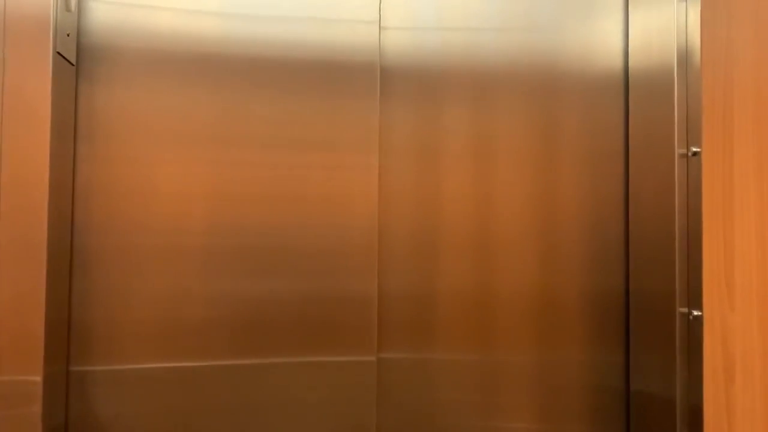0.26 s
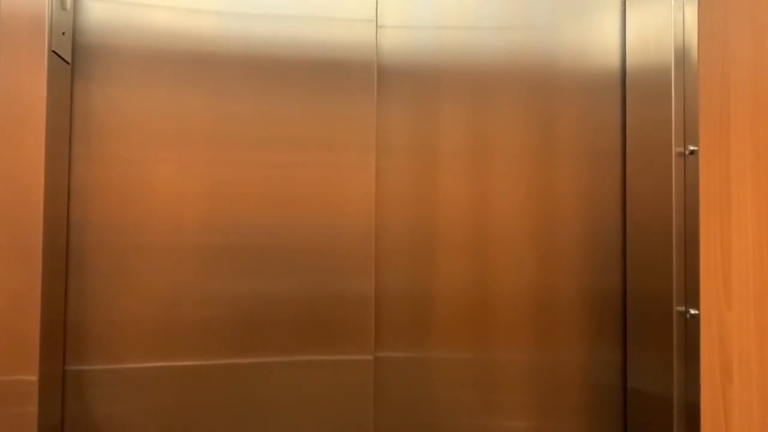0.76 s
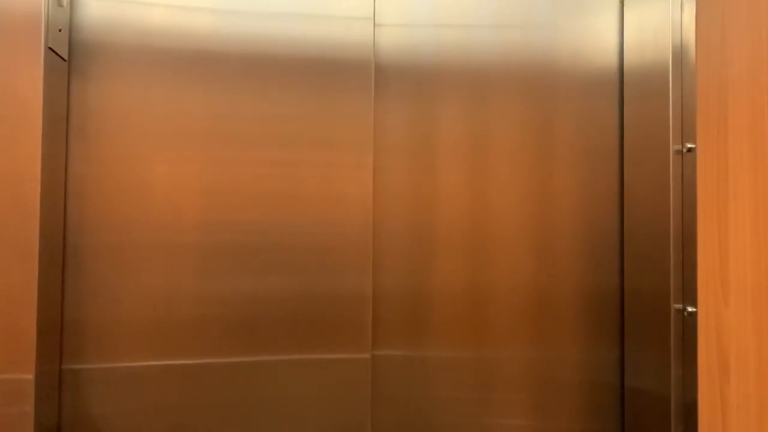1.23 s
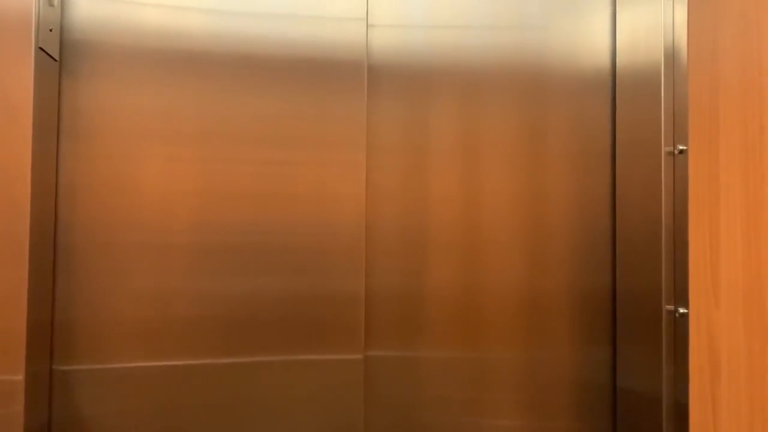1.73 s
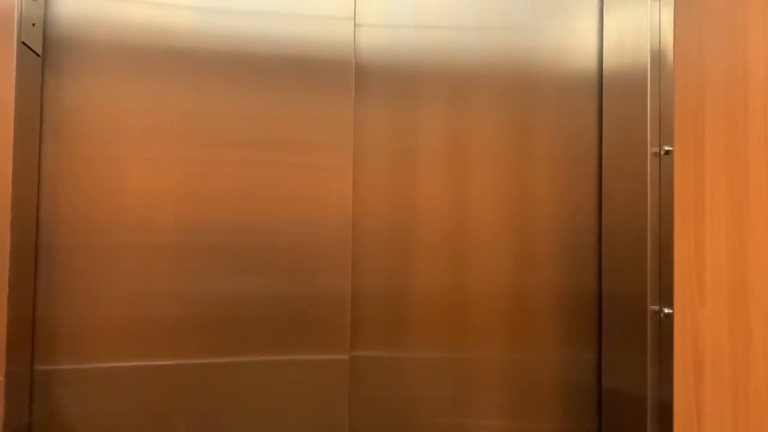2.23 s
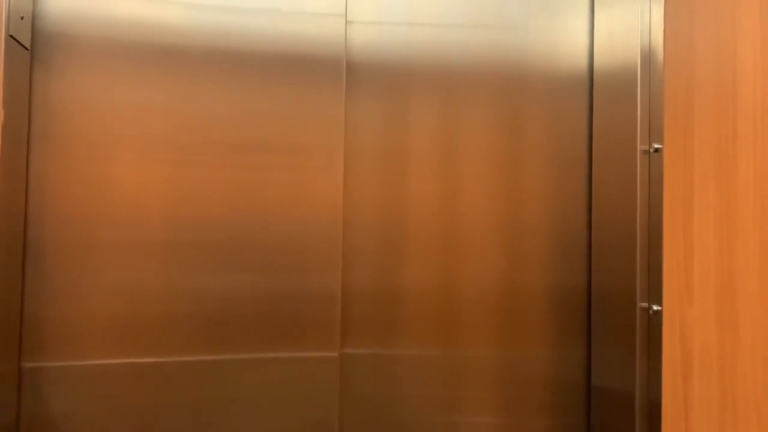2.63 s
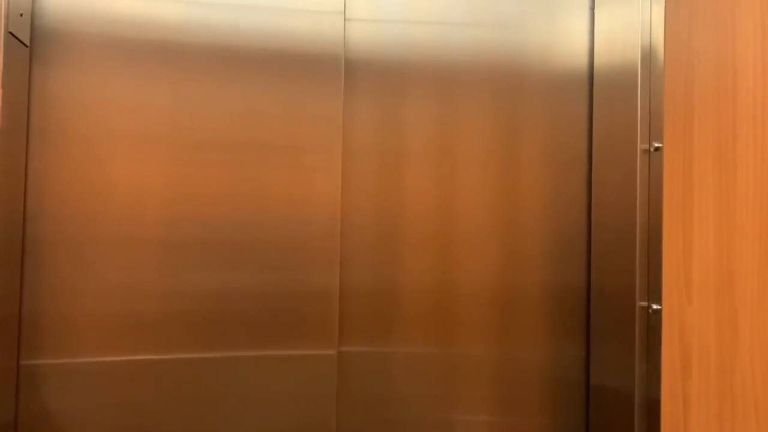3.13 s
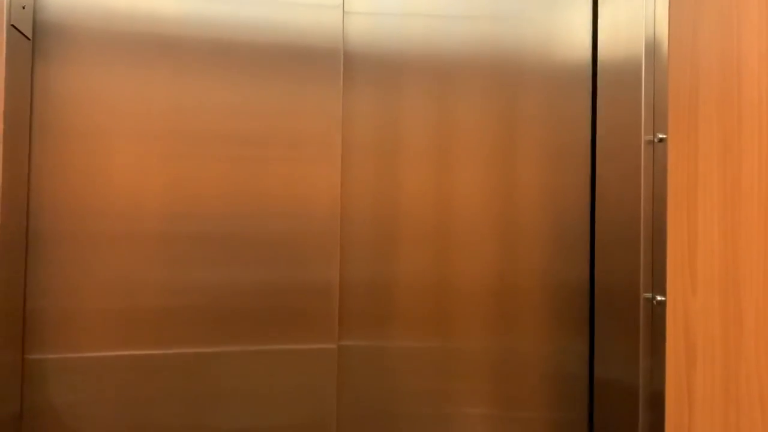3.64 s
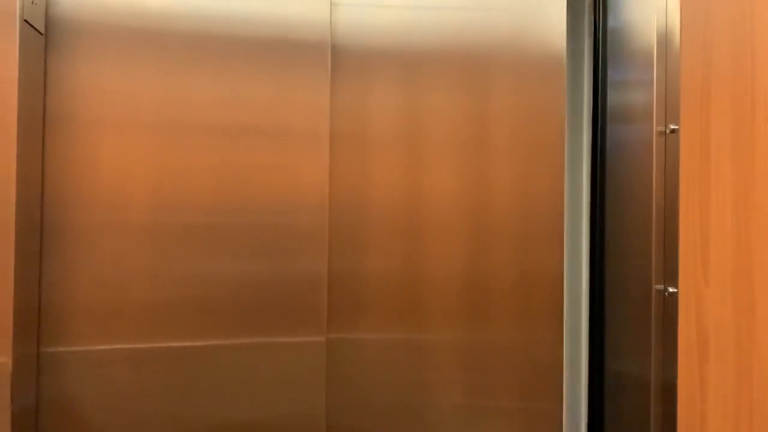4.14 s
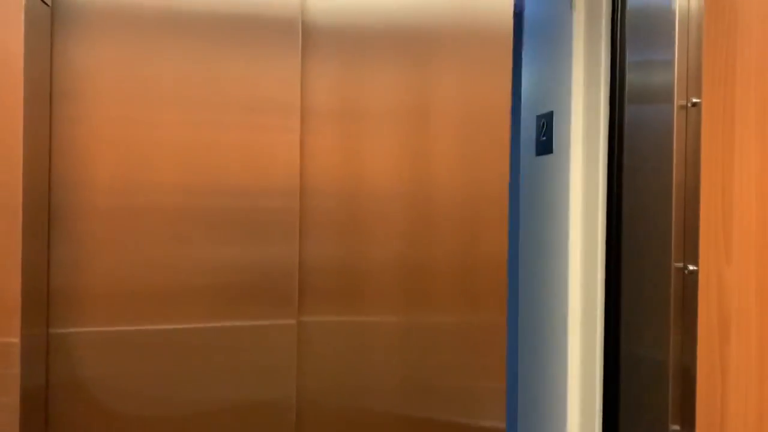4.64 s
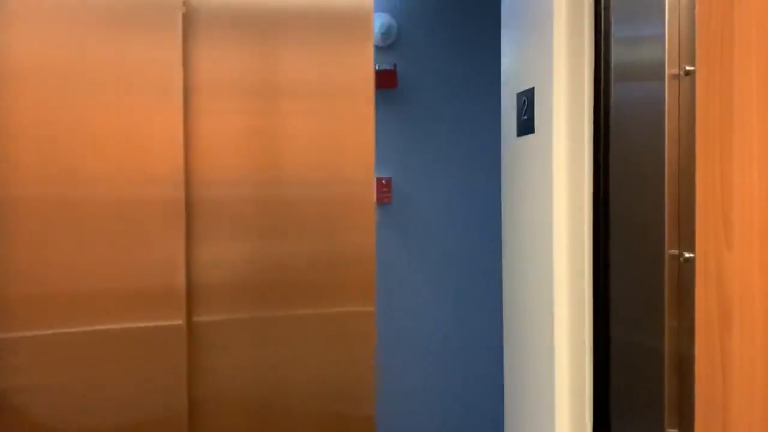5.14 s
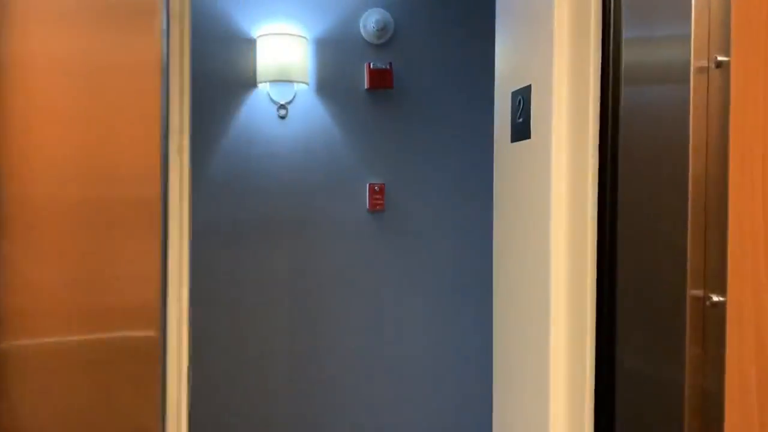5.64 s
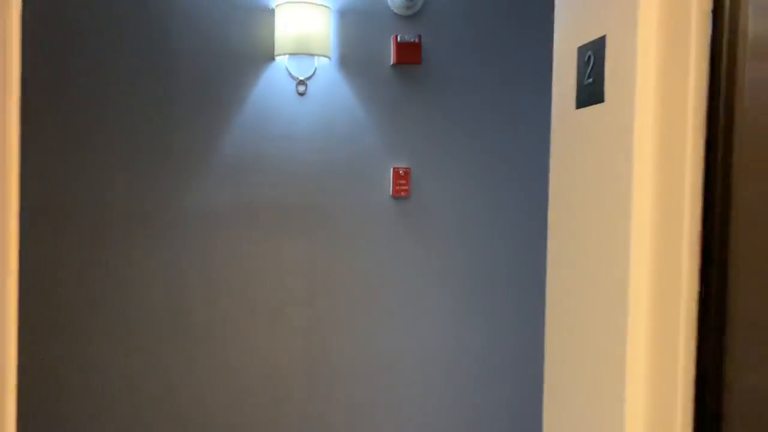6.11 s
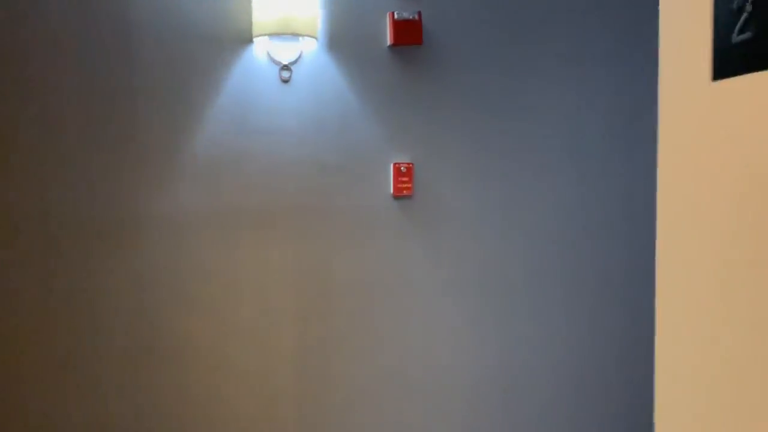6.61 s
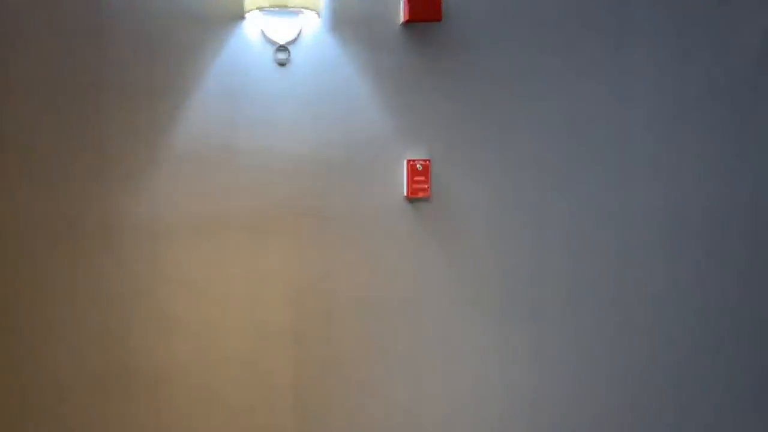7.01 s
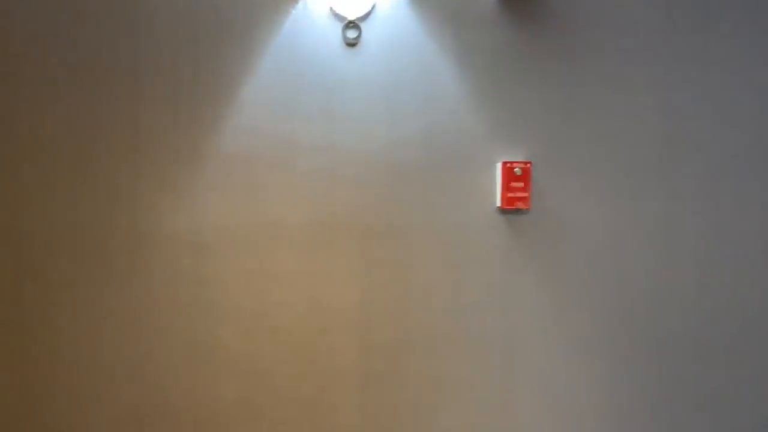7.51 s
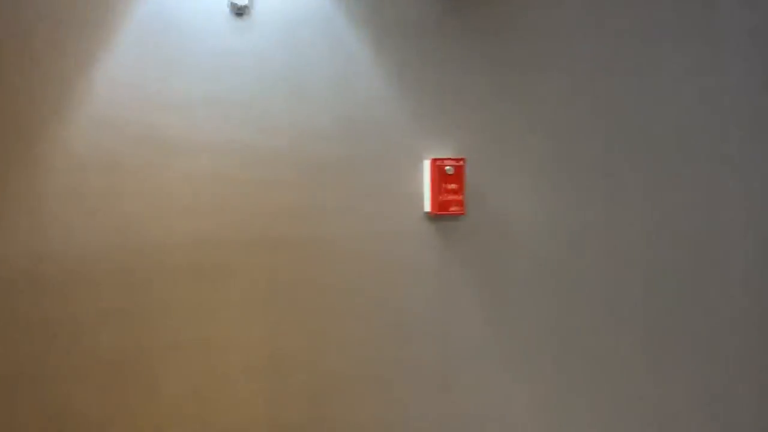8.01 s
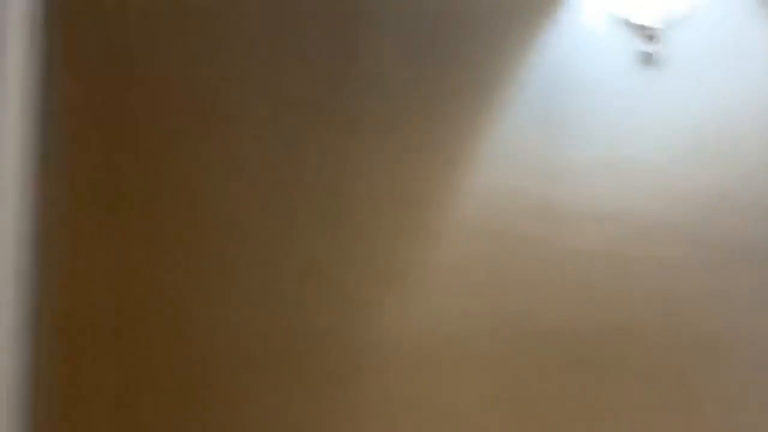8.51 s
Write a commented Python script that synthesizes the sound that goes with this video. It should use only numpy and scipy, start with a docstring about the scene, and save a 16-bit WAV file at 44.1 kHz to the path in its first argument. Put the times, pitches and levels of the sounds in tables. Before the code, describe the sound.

A fan hums inside an elevator, then the door clunks and slides open, and soft footsteps move out as the hum fades.

```python
"""A ceiling fan hums and blows close above the microphone, inside a steel elevator cab nearing a landing.
The ride's rumble dies away. Close by, the door unlatches with a clunk, rolls open with a hiss and faint
squeaks, and bumps its rubber stop. The stereo microphone is carried out into the corridor at ear height,
with soft steps and rustling clothes right under it, and the fan falls behind."""
import sys
import numpy as np
from scipy import signal
from scipy.fft import rfft, irfft, next_fast_len
from scipy.io import wavfile

SR = 44100
rng = np.random.default_rng(int(sys.argv[2]) if len(sys.argv) > 2 else 0)


def dump(signal):
    """Clip the signal to [-1, 1] and save it as 16-bit WAV at the path in sys.argv[1]."""
    limited = np.clip(np.atleast_2d(signal).T, -1, 1)
    pcm = np.round(limited * 32767).astype(np.int16)
    wavfile.write(sys.argv[1], SR, pcm)


N = 386307
TIME = np.arange(N) / SR
HALF_OPEN_S = 5.04  # the door is at mid-travel
STREAM_FOLLOWS = 0.86  # share of the hum's level changes that the air stream follows
BASS_LEAD_RAD = 0.27  # the bass reaches the right channel first

# the fan at the microphone, in the cab and then walking out: (time [s], hum [dB], octave [dB])
FAN_LEVEL = [(0.2, -23.5, -35), (1.3, -23, -38), (2.0, -24, -40.5), (3.2, -23, -37), (4.2, -23, -37),
             (5.1, -24, -34.5), (6.2, -26, -43), (7.0, -31.5, -50.5), (7.7, -34, -52), (8.3, -32.5, -50),
             (8.7, -32.5, -44.5)]
# stereo balance at the microphone: (frequency [Hz], left minus right [dB])
BALANCE = [(110, -3), (220, -3), (400, -0.5), (700, -0.5), (4000, -0.1), (9000, -1)]
# spectrum of loose door hardware: (frequency [Hz], density [dB])
RATTLE = [(700, -21), (1400, 5.5), (1800, -3), (2400, -2.5), (3300, -4.5), (5000, -7.5), (8000, -14.5),
          (11000, -17), (15000, -47)]


def fan_hum(hum_hz=118.1, sag_hz=0.65):
    """The fan motor overhead hums unsteadily, a little slower while the car moves."""
    # weak overtones of the motor: (harmonic [number], level [dB])
    overtones = [(3, -61), (4, -63.5)]
    pitch = hum_hz - sag_hz * car_moving()
    phase, hz = 2 * np.pi * np.cumsum(pitch) / SR, pitch.mean()
    hum_db, octave_db = in_time(FAN_LEVEL)
    hum_db = hum_db - hump(3.68, 17, 0.016)  # a brief dip under the latch's clunk
    hum = (1 + 0.057 * flutter(8.4, 3.6)) * tone(phase + 0.027 * flutter(10, 2.2), hz)
    octave = (1 + 0.4 * flutter(3.2, 7.5)) * tone(2 * phase + 0.39 * flutter(6.1, 4.4), 2 * hz)
    # the microphone passes through a standing wave in the corridor, which lifts the third harmonic
    lifts_db = hump(8.48, 14.5, 0.28), 0
    upper = sum(from_db(db + lift_db) * tone(k * phase, k * hz)
                for (k, db), lift_db in zip(overtones, lifts_db))
    upper *= fan_gain(0, follows=0.6) * (1 + 0.21 * flutter(1.4, 5.7))
    return from_db(hum_db) * hum + from_db(octave_db) * octave + upper


def fan_air():
    """Air rushes from the fan; as the door opens, the cab's resonances give way to the corridor's."""
    # spectrum of the air stream: (frequency [Hz], density [dB])
    stream = [(250, -16), (420, 2), (540, 3.5), (700, 1), (950, -1.5), (1200, -1), (1800, -5.5), (2200, -6),
              (2700, -8), (3300, -15), (4500, -17.5), (7000, -34.5), (15000, -51)]
    # resonances of the cab's grille and panels: (frequency [Hz], width [Hz], lift [dB])
    grille = [(482, 36, 10), (559, 30, 8), (704, 15, 10), (808, 84, 4.5), (1177, 98, 9), (1650, 110, 2.5),
              (2540, 300, 3), (3940, 1400, 3), (6360, 820, 5)]
    # resonances of the corridor: (frequency [Hz], width [Hz], lift [dB])
    corridor = [(1120, 470, 5.5), (1510, 24, 9.4)]
    opening = door_open()
    closed = np.sqrt(1 - opening) * fan_gain(-45.5, STREAM_FOLLOWS) * noise(stream, grille)
    opened = np.sqrt(opening) * fan_gain(-46, STREAM_FOLLOWS) * noise(stream, corridor)
    return closed + opened


def panel_drone():
    """The cab's panels drone in the fan's air, all around the microphone."""
    # spectrum of the drone: (frequency [Hz], density [dB])
    drone = [(38, -6), (50, -5), (100, 3.5), (128, 10), (148, -4.5), (205, -13), (232, 2), (260, -10.5),
             (345, -6), (430, -16), (700, -25)]
    # panel resonances: (frequency [Hz], width [Hz], lift [dB])
    panels = [(83.6, 2.8, 2.5), (176, 28, 11), (273.2, 25, 11.5), (301, 4.8, 7.5), (349, 28, 7),
              (389.4, 6.2, 7.5)]
    return fan_gain(-35.5, follows=1) * noise(drone, panels)


def fan_whines(waver=0.003):
    """Thin, slightly unsteady tones of the fan that fade with its air stream."""
    # the fan's high tones: (frequency [Hz], relative level [dB])
    whines = [(1922, -76), (2509, -74.5), (2923, -76.5), (3590, -79), (3898, -82), (4210, -80), (4900, -83)]
    phase_per_hz = 2 * np.pi * np.cumsum(1 + waver * flutter(0.79, 6)) / SR
    tones = sum(from_db(db) * tone(hz * phase_per_hz, hz, lead_rad=0.73) for hz, db in whines)
    return fan_gain(-4, STREAM_FOLLOWS) * tones


def hiss():
    """A high hiss of fan air and sliding door, with a slight random level wobble added."""
    # spectrum of the hiss: (frequency [Hz], density [dB])
    spectrum = [(1500, -13.5), (3900, 9.5), (5400, 2.5), (6500, 4.5), (8500, 2.5), (10200, 2.5),
                (13700, -5.5), (15000, -26)]
    gain = np.hypot(fan_gain(-64.5, follows=0.5), door_running() * from_db(-60.5))
    return gain * from_db(1.85 * flutter(2.2, 12)) * noise(spectrum)


def door_thuds(clang_db=-33):
    """Soft knocks of the door gear thud through the cab and faintly ring the steel; the last one is a first
    step onto the sill."""
    # knocks of the gear, then the first step onto the sill: (time [s], level [dB])
    knocks = [(3.527, -27), (3.546, -26.5), (3.584, -26), (3.613, -33), (3.669, -27), (3.712, -25.5),
              (6.709, -31)]
    # spectrum of a thud: (frequency [Hz], density [dB])
    spectrum = [(35, -19), (75, 0), (120, 8.5), (180, -2), (290, 0), (350, -8), (430, -15), (700, -15.5),
                (1500, -35)]
    out = np.zeros((2, N))
    for s, db in knocks:
        thud = burst(spectrum, t60=0.32, rise_s=0.0015, tail_db=-11, tail_t60=0.99)
        add(out, s, from_db(db) * (thud + from_db(clang_db) * steel_clang()))
    return out


def door_latch(rattle_lead_s=0.0073, rattle_peak_s=3.64, fall_db_per_s=295):
    """The latch snaps and rebounds unevenly; the linkage rattles just ahead of each contact."""
    # contacts of the latch: (time [s], level [dB])
    contacts = [(3.623, -26), (3.637, -26.5), (3.648, -30), (3.664, -30.5), (3.682, -35)]
    out = np.zeros((2, N))
    add(out, 3.526, from_db(-40) * steel_clang())  # the coupler first taps the latch
    for s, db in contacts:
        rattle = burst(RATTLE, t60=0.085, rise_s=0.00064, tail_db=-10.5, tail_t60=0.34)
        rattle_db = -35.5 - fall_db_per_s * abs(s - rattle_peak_s)
        add(out, s - rattle_lead_s, from_db(rattle_db) * rattle)
        add(out, s, from_db(db) * steel_clang())
    return out


def steel_clang(rise_s=0.00079):
    """Latch hook and cab ring after a blow, and the door panel's modes sound in random phases."""
    # spectrum of the struck steel: (frequency [Hz], density [dB])
    steel = [(200, -11), (315, 9), (420, -4), (540, 8), (760, -4.5), (1050, -1.5), (1400, -9), (1800, -13),
             (2500, -17), (8000, -41)]
    # resonances of the latch hook: (frequency [Hz], width [Hz], lift [dB])
    hook = [(1040, 70, 9), (1225, 70, 8), (2260, 160, 6), (2700, 200, 5)]
    # door panel modes: (frequency [Hz], relative level [dB], t60 [s])
    modes = [(237, -12, 0.7), (297, -8, 0.6), (345, -9, 0.7), (479, -18, 0.7), (671, -21, 0.8),
             (719, -21, 0.7), (1034.5, -11, 0.24), (1093, -16, 0.36), (1197, -16, 0.3), (1356, -17, 0.25),
             (2226, -17, 0.15), (2476, -23, 0.2)]
    blow = burst(steel, t60=0.13, rise_s=0.00033, tail_db=-12.5, tail_t60=0.84, peaks=hook)
    t = np.arange(SR // 2) / SR
    panel = np.zeros_like(blow)
    for hz, db, t60 in modes:
        phase, lead_rad = rng.normal(0, [np.pi, 0.5])
        panel += from_db(db - 60 * t / t60) * tone(2 * np.pi * hz * t + phase, hz, lead_rad)
    return from_db(1.5) * blow + from_db(-3) * panel * (1 - np.exp(-t / rise_s))


def door_rollers(level_db=-50, sweep_lift_db=2):
    """Rollers rumble along their track, a little louder with the door's speed."""
    # spectrum of the rolling: (frequency [Hz], density [dB])
    rolling = [(250, 4.5), (410, 3.5), (540, -18), (1050, -7), (1800, -15.5), (4200, -24), (9000, -32)]
    # resonances of the track: (frequency [Hz], width [Hz], lift [dB])
    track = [(413, 33, 11), (1160, 120, 5), (2430, 400, 5)]
    opening = door_open()
    speed = 4 * opening * (1 - opening)
    gain = door_running() * from_db(level_db + sweep_lift_db * speed + 5 * flicker(1.4, 16))
    return gain * noise(rolling, track)


def floor_shake(easing_db=5):
    """The running door shakes the floor under the microphone, less once it is open and slowing."""
    # spectrum of the floor: (frequency [Hz], density [dB])
    spectrum = [(25, -6), (45, -8), (70, -2), (120, -8)]
    return door_running() * from_db(-40.5 - easing_db * door_open()) * noise(spectrum)


def door_stop(hangers_db=-27):
    """The door bumps its rubber stop and settles; its hangers rattle at each contact."""
    # contacts with the stop: (time [s], level [dB])
    contacts = [(6.879, -24.5), (6.909, -34), (6.934, -33)]
    # spectrum of a bump: (frequency [Hz], density [dB])
    spectrum = [(60, -16), (150, 3.5), (280, 0), (420, -6), (600, -4), (780, -17.5), (1050, -15),
                (1500, -29), (2700, -25), (5000, -38), (10000, -45)]
    # resonances of the stop: (frequency [Hz], width [Hz], lift [dB])
    rings = [(170, 16, 8), (458, 50, 7), (645, 100, 9), (910, 60, 8)]
    out = np.zeros((2, N))
    for s, db in contacts:
        bump = burst(spectrum, t60=0.09, rise_s=0.0005, tail_db=-14.5, tail_t60=1.0, peaks=rings)
        hangers = burst(RATTLE, t60=0.13, rise_s=0.0003, tail_db=-16, tail_t60=0.27)
        add(out, s, from_db(db) * (bump + from_db(hangers_db) * hangers))
    return out


def drive_belt(hz=2460, width_hz=55):
    """The belt sings thinly, on and off, through the second half of the door's travel."""
    singing = ramp(4.75, 0.6) * (1 - ramp(6.98, 0.53))
    whine = np.array([flutter(hz, width_hz) for channel in range(2)])
    return singing * from_db(-62.5 + 4 * flicker(5.6, 4)) * whine


def roller_squeaks(waver=0.0085):
    """A roller sings briefly, unsteady in pitch."""
    # squeaks: (time [s], length [s], pitch [Hz], level [dB])
    squeaks = [(5.528, 0.085, 9250, -61), (5.73, 0.12, 2430, -55), (6.393, 0.038, 8100, -55.5),
               (7.042, 0.072, 9200, -65), (7.088, 0.084, 9100, -60)]
    out = np.zeros((2, N))
    unsteady = 1 + waver * flutter(30, 60)
    for s, length, hz, db in squeaks:
        n = int(length * SR)
        phase = 2 * np.pi * hz * np.cumsum(unsteady[int(s * SR):][:n]) / SR
        add(out, s, from_db(db) * np.hanning(n) * tone(phase, hz, lead_rad=1))
    return out


def gear_ticks():
    """Small parts of the door gear touch and ring briefly."""
    # ticks: (time [s], level [dB], ringing [Hz])
    ticks = [(2.449, -52.5, 5070), (2.619, -54.5, 5700), (2.803, -63, 7200), (5.359, -48.5, 4040),
             (5.746, -50, 3000)]
    return light_contacts(ticks, t60=0.12, rise_s=0.00046, ring_db=13)


def ride_rumble(hz=35.6, brake_s=0.86, halt_s=1.82, fall_db_per_s=34):
    """The car shudders at one low, unsteady frequency, harder as it brakes, then dies away."""
    level_db = -45.5 + 5 * ramp(brake_s, 0.25) - fall_db_per_s * np.maximum(TIME - halt_s, 0)
    phase = 2 * np.pi * hz * TIME + 0.46 * flutter(2.5, 1.9)
    return from_db(level_db) * (1 + flutter(2.8, 5)) * tone(phase, hz)


def rail_rub():
    """Beyond the cab wall, the guides rub along the shaft's rails until the car stops."""
    # spectrum of the rubbing: (frequency [Hz], density [dB])
    spectrum = [(560, -2), (800, 3.5), (940, -14.5), (1180, 3), (1500, -5.5), (2200, -19.5),
                (4800, -29), (6000, -37.5)]
    return car_moving() * from_db(-56 + 6.5 * flicker(5, 5.5)) * noise(spectrum)


def footsteps():
    """Shoes land dully below the microphone, over the sill and beyond."""
    # footfalls: (time [s], level [dB])
    steps = [(6.764, -29), (6.986, -33), (7.225, -33.5), (7.297, -30), (7.566, -45), (7.61, -37.5),
             (7.691, -40)]
    # spectrum of a footfall: (frequency [Hz], density [dB])
    spectrum = [(35, -23), (80, 11), (130, 1.5), (220, 7.5), (330, -12), (520, -13), (750, -29),
                (1500, -28)]
    out = np.zeros((2, N))
    for s, db in steps:
        add(out, s, from_db(db) * burst(spectrum, t60=0.23, rise_s=0.0039, tail_db=-15.5, tail_t60=0.78))
    return out


def shuffle():
    """Clothes brush and shoes shuffle in one uneven swell on the way out."""
    # spectrum of the brushing: (frequency [Hz], density [dB])
    spectrum = [(150, 6), (300, -4.5), (600, -14.5), (1500, -20.5), (4000, -28.5), (9000, -32),
                (14000, -60)]
    return hump(7.55, from_db(-46.5), 0.35) * from_db(2.5 * flutter(4.6, 14)) * noise(spectrum)


def rustles():
    """Brief, soft-edged rustles and scuffs near the microphone."""
    # rustles and scuffs: (time [s], level [dB], centre [Hz])
    scuffs = [(2.660, -44, 3870), (2.735, -44, 2490), (2.904, -48.5, 6030), (3.588, -42.5, 6500),
              (3.783, -42.5, 6100), (5.452, -47, 8100), (6.159, -48, 6700), (6.262, -46, 5460),
              (6.805, -46, 12000), (7.228, -39, 490), (7.465, -59, 11000), (7.528, -55, 11000),
              (7.595, -42, 540), (7.616, -51, 8800), (7.77, -43.5, 850)]
    return light_contacts(scuffs, t60=0.14, rise_s=0.013, ring_db=-1)


def clinks(ring_db=10, width_hz=450, range_hz=(8200, 13900)):
    """Metal pieces on clothing clink close to the microphone, each with three high resonances."""
    # touches of metal: (time [s], level [dB])
    touches = [(5.645, -46), (6.826, -43), (7.757, -46), (7.766, -43), (8.058, -47), (8.068, -48.5),
               (8.347, -49.5)]
    # spectrum of a clink: (frequency [Hz], density [dB])
    spectrum = [(2500, -24), (5500, -6), (9000, -10), (10700, -7), (13400, -6), (14400, -1), (15600, -17)]
    out = np.zeros((2, N))
    for s, db in touches:
        rings = [(hz, width_hz, ring_db) for hz in rng.uniform(*range_hz, 3)]
        clink = burst(spectrum, t60=0.0085, rise_s=0.0009, tail_db=-11.5, tail_t60=0.24, peaks=rings)
        add(out, s, from_db(db) * clink)
    return out


def fan_gain(db, follows):
    """Gain that follows a share of the hum's level changes as the fan falls behind."""
    fan_db = in_time(FAN_LEVEL)[0]
    return from_db(db + follows * (fan_db - np.median(fan_db)))


def car_moving():
    """1 while the car travels, easing to 0 as it settles at the landing."""
    return 1 - ramp(2.2, 0.9)


def door_open(sweep_s=0.18):
    """Share of the doorway that is open: a slow start, a quick sweep, a slow finish."""
    return .5 + .5 * np.tanh((TIME - HALF_OPEN_S) / sweep_s)


def door_running(start_s=3.36, stop_s=6.65, nearing_db_per_s=1.5):
    """Gain of the door's running noise, which grows as the microphone nears the track."""
    running = ramp(start_s, 0.36) * (1 - ramp(stop_s, 0.67))
    return running * from_db(nearing_db_per_s * (TIME - HALF_OPEN_S))


def light_contacts(rows, t60, rise_s, ring_db, grain_db=3):
    """Broad, grainy bursts, with a resonance at the centre where something small rings."""
    out = np.zeros((2, N))
    for s, db, hz in rows:
        colour = [(hz / 4, -10), (hz / 2, -5), (hz, 0), (2 * hz, -10), (4 * hz, -25)]
        contact = burst(colour, t60, rise_s, tail_db=-16, tail_t60=0.43, peaks=[(hz, 0.13 * hz, ring_db)])
        add(out, s, from_db(db) * contact)
    return out * from_db(grain_db * flicker(60, 90))


def burst(spectrum, t60, rise_s, tail_db, tail_t60, peaks=()):
    """A blow on densely packed modes: a quick rise, its own decay, and the cab's longer tail."""
    t = np.arange(SR // 2) / SR
    decay = from_db(-60 * t / t60) + from_db(tail_db - 60 * t / tail_t60)
    return noise(spectrum, peaks, size=len(t)) * decay * (1 - np.exp(-t / rise_s))


def noise(spectrum, peaks=(), size=N, apart_hz=452):
    """Diffuse noise at the microphone: channels alike in the bass, unrelated in the treble; rms 1."""
    n = next_fast_len(size, real=True)
    f = np.arange(n // 2 + 1) * SR / n
    db = at_hz(spectrum, f) + sum(lift / (1 + (2 * (f - hz) / width) ** 2) for hz, width, lift in peaks)
    low_cut = 1 / (1 + (spectrum[0][0] / (1.5 * f + 1)) ** 4)
    high_cut = 1 / (1 + (f / (2 * spectrum[-1][0])) ** 4)
    mid, side = rfft(rng.standard_normal((2, n))) * from_db([wall_ripple(f), wall_ripple(f)])
    alike = .98 / (1 + (f / apart_hz) ** 6)
    sides = np.array([[1], [-1]])
    pair = np.sqrt(1 + alike) * mid + np.sqrt(1 - alike) * side * sides
    pair *= from_db(sides * at_hz(BALANCE, f) / 2) * np.exp(-.5j * sides * BASS_LEAD_RAD)
    return rms_one(irfft(pair * from_db(db) * low_cut * high_cut, n)[:, :size])


def wall_ripple(f, depth_db=4, spacing_hz=21.336, above_hz=240):
    """Reflections between close walls cut fine peaks and dips into the upper spectrum, in dB."""
    grid = np.arange(int(SR / 2 / spacing_hz) + 2) * spacing_hz
    heights = np.resize(rng.standard_normal(4096), len(grid))
    return depth_db * np.interp(f, grid, heights) * f ** 2 / (f ** 2 + above_hz ** 2)


def tone(phase, hz, lead_rad=BASS_LEAD_RAD):
    """A partial in both channels, the right one leading."""
    sides = np.array([[1], [-1]])
    return np.sqrt(2) * np.cos(phase - sides * lead_rad / 2) * from_db(sides * at_hz(BALANCE, hz) / 2)


def flutter(rate_hz, width_hz):
    """Random wobble around one rate; rms 1."""
    n = next_fast_len(N, real=True)
    f = np.arange(n // 2 + 1) * SR / n
    band = np.exp(-.5 * ((f - rate_hz) / width_hz) ** 2)
    return rms_one(irfft(rfft(rng.standard_normal(n)) * band, n)[:N])


def flicker(rate_hz, width_hz):
    """Random wobble whose extremes are rounded off."""
    return 2 * np.tanh(flutter(rate_hz, width_hz) / 2)


def ramp(start_s, length_s):
    """Rises evenly from 0 to 1."""
    return np.clip((TIME - start_s) / length_s, 0, 1)


def hump(s, height, half_s):
    """A smooth rise and fall around one moment."""
    return height * np.exp(-((TIME - s) / half_s) ** 2)


def in_time(rows):
    """One value per sample for each column of a curve."""
    s, *columns = np.transpose(rows)
    return [np.interp(TIME, s, column) for column in columns]


def at_hz(points, hz):
    """Read a spectrum on a log-frequency axis."""
    f, value = np.transpose(points)
    return np.interp(np.log(hz + 1), np.log(f), value)


def from_db(db):
    """Decibels to gain."""
    return 10 ** (np.asarray(db) / 20)


def rms_one(x):
    """Scale to unit power."""
    return x / np.sqrt(np.mean(x ** 2) + 1e-20)


def add(out, s, sound):
    """Mix a sound in at a time."""
    start = int(np.clip(s * SR, 0, N - 1))
    out[:, start:start + sound.shape[1]] += sound[:, :N - start]


def scene():
    """Everything that reaches the microphone, in the cab and on the way out."""
    fan = fan_hum() + fan_air() + panel_drone() + fan_whines()
    knocks = door_thuds() + door_latch() + door_stop() + gear_ticks()
    sliding = door_rollers() + floor_shake() + drive_belt() + roller_squeaks()
    ride = ride_rumble() + rail_rub()
    walking = footsteps() + shuffle() + rustles() + clinks()
    return fan + hiss() + knocks + sliding + ride + walking


def record(dry, cutoff_hz=15600):
    """The microphone's signal, with the top treble cut steeply."""
    return signal.sosfilt(signal.ellip(10, .1, 80, cutoff_hz, fs=SR, output="sos"), dry)


dry = scene()
out = record(dry)
dump(out)
```